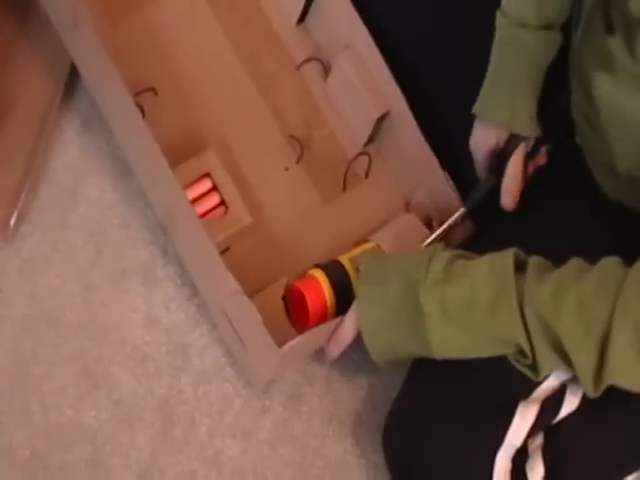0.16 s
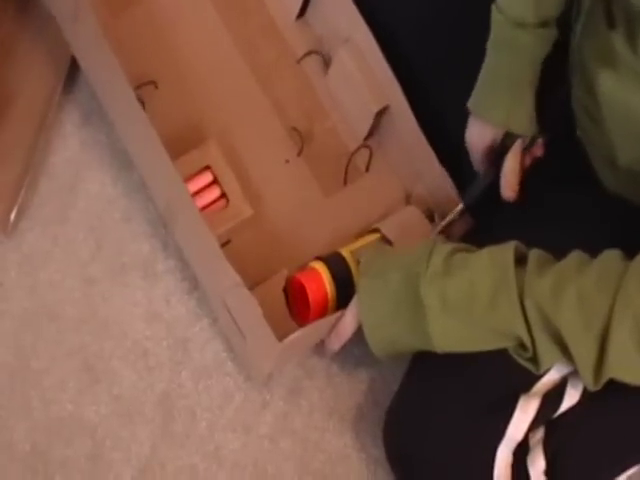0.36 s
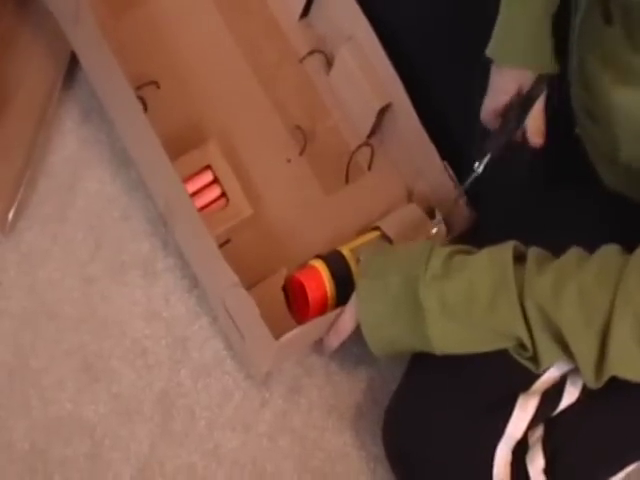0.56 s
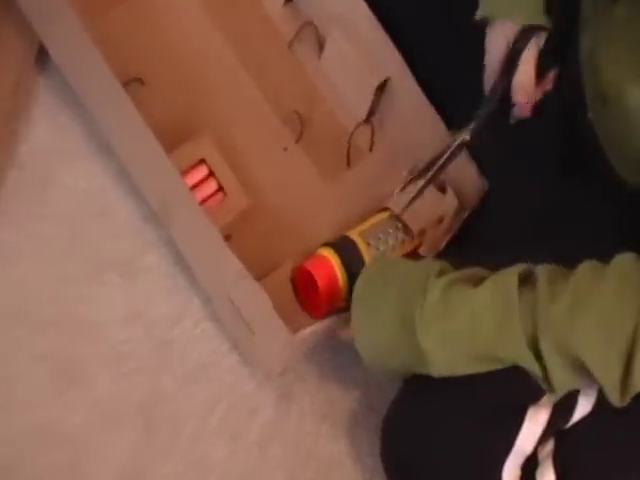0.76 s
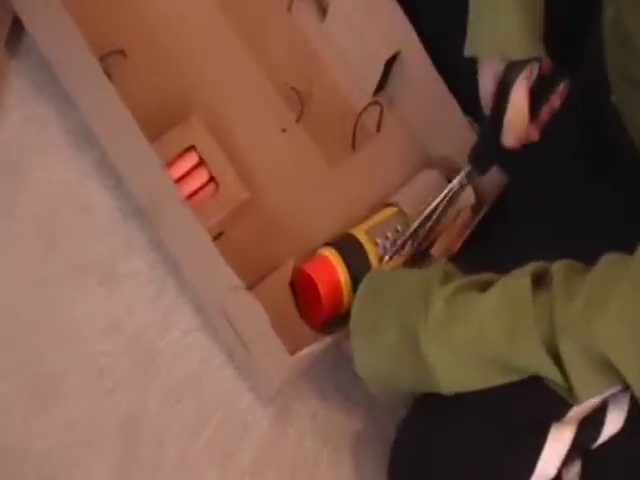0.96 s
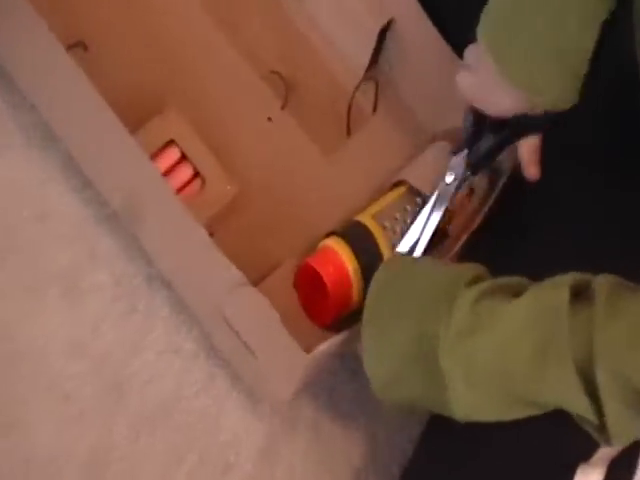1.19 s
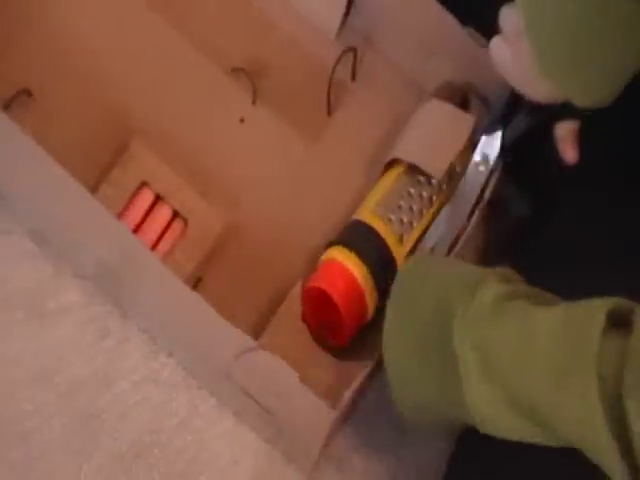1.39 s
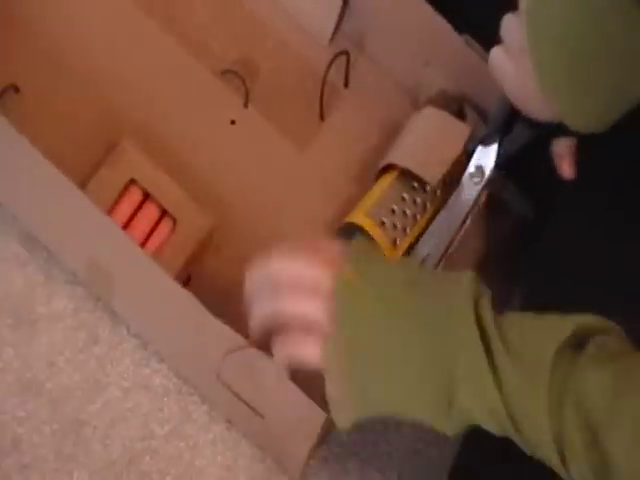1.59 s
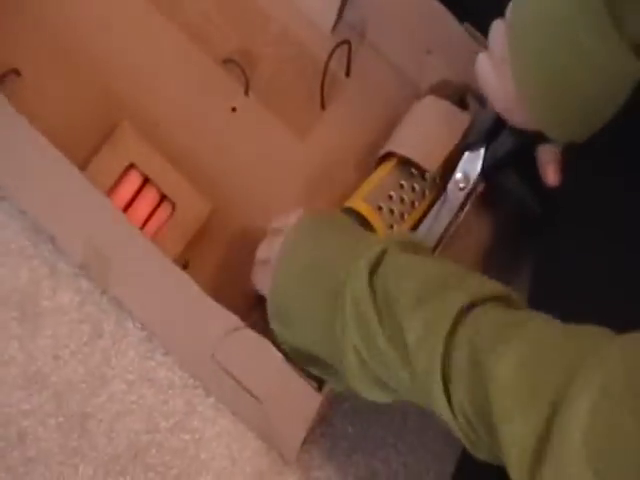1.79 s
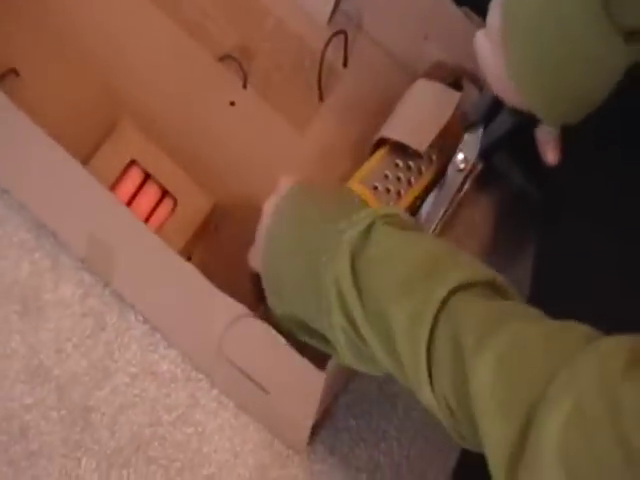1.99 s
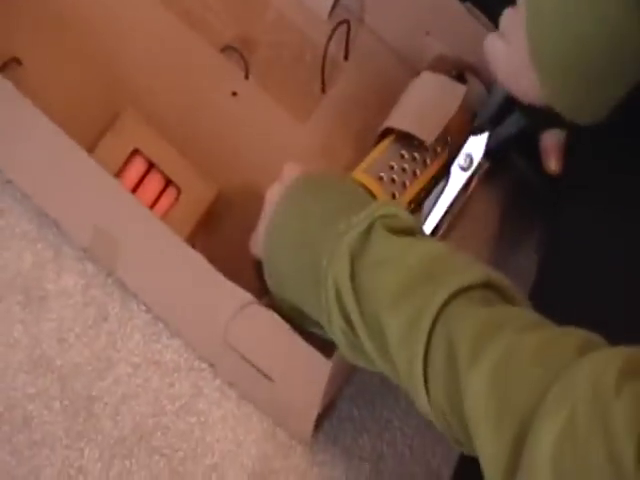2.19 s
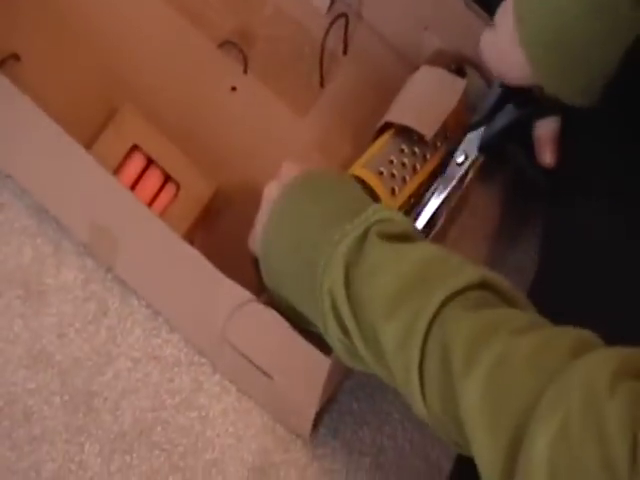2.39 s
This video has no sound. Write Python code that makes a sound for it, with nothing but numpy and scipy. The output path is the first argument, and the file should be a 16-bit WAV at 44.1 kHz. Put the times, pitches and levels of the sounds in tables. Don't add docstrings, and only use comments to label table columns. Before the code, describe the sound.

Scissors snip a wire tie: a faint knock fades, blades tick at 0.2 s, then one loud, bright metallic snap at 0.24 s with a short rattle. Light taps and rubs follow around 0.45 and 0.75 s. Hollow plastic knocks and steel clicks come at 0.95-1.2, 1.46 and 1.8-1.9 s, among cardboard thumps and scrapes, with a last small rustle near 2.15 s. Furnished room, faint hiss and hum.

```python
import sys
import numpy as np
from scipy import signal
from scipy.fft import rfft, irfft
from scipy.io import wavfile
from scipy.ndimage import uniform_filter1d

SR = 44100
rng = np.random.default_rng(int(sys.argv[2]) if len(sys.argv) > 2 else 0)


def generate_wav(sig):
    pcm = np.round(np.clip(np.atleast_2d(sig).T, -1, 1) * 32767).astype(np.int16)
    wavfile.write(sys.argv[1], SR, pcm)


def makeup_ratio(level_db):
    decades = np.asarray(level_db, float) / 20
    return 10 ** decades


N = 108045
T = np.arange(N) / SR
LEFT_RIGHT = np.array([[1], [-1]])


def unit(x):
    return x / np.sqrt(np.mean(x ** 2) + 1e-30)


def table(points, hz):
    p = np.array(points, float)
    return np.interp(np.log(hz + 1), np.log(p[:, 0]), p[:, 1])


def colour(x, points):
    gain = makeup_ratio(table(points, np.fft.rfftfreq(len(x), 1 / SR)))
    return irfft(rfft(x) * gain, len(x))


def band(x, hz, width):
    return signal.lfilter(*signal.iirpeak(min(hz, 18000), hz / width, fs=SR), x)


def body(x, modes, widen=1):
    return sum((-1) ** k * makeup_ratio(db) * band(x, f, w * widen) for k, (f, w, db) in enumerate(modes))


def high_pass(x, order, hz):
    return signal.sosfilt(signal.butter(order, hz, "high", fs=SR, output="sos"), x)


def walk(rate):
    k = int(SR / rate)
    steps = np.repeat(rng.standard_normal(N // k + 1), k)
    return unit(uniform_filter1d(steps, k)[:N])


def sparse_grains(per_s):
    return (rng.random(N) < per_s / SR) * rng.standard_normal(N)


def contacts(rows, voice):
    out, t = np.zeros(N), T[:4096]
    noise = rng.standard_normal((len(rows), 4096))
    for row, n in zip(rows, noise):
        tau = max(row[-1], .1) / 1000
        scrape = n * np.minimum(t / (0.22 * tau), 1) * np.exp(-t / (.5 * tau))
        hit = voice(scrape, row)
        start = int(row[0] * SR)
        hit = hit[:N - start] * makeup_ratio(row[1]) / np.abs(hit).max()
        out[start:start + len(hit)] += hit
    return out


# pitch_hz, level_db
HISS_SPECTRUM = [(15, -48), (25, -28), (405, -2.5), (641, -12), (936, -2), (1940, -8), (2840, -1),
                 (3340, -10.5), (16000, -21.5)]
HISS_DB, HISS_SIDE_DB = -65, -7.5
HUM_HZ, HUM_DB = 119.7, -88


def background():
    mid, side = (unit(colour(rng.standard_normal(N), HISS_SPECTRUM)) for _ in range(2))
    hum = np.sqrt(2) * makeup_ratio(HUM_DB) * np.sin(2 * np.pi * HUM_HZ * T)
    return makeup_ratio(HISS_DB) * (mid + makeup_ratio(HISS_SIDE_DB) * side * LEFT_RIGHT) + hum


# pitch_hz, t60_s
ROOM_T60 = [(300, 0.32), (3000, 0.54), (12000, 0.045)]
# pitch_hz, likeness_0_to_1
ROOM_LIKENESS = [(200, 0.95), (900, 1), (2200, 0.99), (5000, 0.56)]
# pitch_hz, level_db
ROOM_TONE = [(250, 6.5), (800, 5), (1700, 4), (2800, 1), (3400, 4), (5000, 1), (7000, -5), (14000, -5)]
ROOM_DB, ROOM_GAP_S = -9, 0.00035


def room(x):
    t = T[:SR * 3 // 4]
    mid, side = rng.standard_normal((2, len(t)))
    tail = 0
    for hz in 125 * 2. ** np.arange(8):
        like = np.clip(table(ROOM_LIKENESS, hz), 0, 1)
        ears = np.sqrt(1 + like) * mid + np.sqrt(1 - like) * side * LEFT_RIGHT
        tail = tail + band(ears, hz, hz * 0.54) * makeup_ratio(-60 * t / table(ROOM_T60, hz))
    power = np.sum(np.abs(rfft(tail)) ** 2, axis=0)
    tone = makeup_ratio(table(ROOM_TONE, np.fft.rfftfreq(len(t), 1 / SR)))
    tail = irfft(rfft(tail) * tone / np.sqrt(uniform_filter1d(power, size=40)), len(t))
    fade_in = np.clip(t / ROOM_GAP_S, 0, 1) ** 2
    fade_out = np.clip(2 - 2 * t / t[-1], 0, 1) ** 2
    tail = tail * fade_in * fade_out
    tail = tail / np.sqrt(np.sum(tail ** 2) / 2)
    return makeup_ratio(ROOM_DB) * signal.fftconvolve(x, tail, axes=1)[:, :N]


# pitch_hz, left_minus_right_db
PORT_LEVEL = [(200, 3), (700, 0.4), (2400, 0.5), (4400, 4), (8100, 2), (13000, 3)]
# pitch_hz, left_leads_rad
PORT_PHASE = [(200, -0.48), (1500, 0.0041), (4500, 0.15), (7700, -1.04), (8500, 1), (12000, -0.55)]


def ports(x):
    hz = np.fft.rfftfreq(N, 1 / SR)
    half = makeup_ratio(table(PORT_LEVEL, hz) / 2) * np.exp(.5j * table(PORT_PHASE, hz))
    return np.array([irfft(rfft(x) * half, N), irfft(rfft(x) / half, N)])


FLOOR_DIP, FLOOR_DIP_HZ, FLOOR_DIP_WIDTH_HZ = 0.31, 3114, 670
LOW_CUT_HZ = 270


def path(x):
    x = x - FLOOR_DIP * band(x, FLOOR_DIP_HZ, FLOOR_DIP_WIDTH_HZ)
    return ports(high_pass(x, 4, LOW_CUT_HZ))


# pitch_hz, width_hz, level_db
EARLIER_MODES = [(1556, 330, -0.5), (2760, 190, -3), (4530, 1340, -10.5)]
# pitch_hz, level_db, t60_s
EARLIER_TONES = [(453.6, -58, 0.36), (914, -45, 0.22), (980, -50, 0.25)]
EARLIER_DB, EARLIER_T60_S = -47.5, 0.26


def earlier():
    tones = sum(makeup_ratio(db - 60 * T / t60) * np.sin(2 * np.pi * hz * T) for hz, db, t60 in EARLIER_TONES)
    wash = unit(body(rng.standard_normal(N), EARLIER_MODES, 0.92))
    return tones + makeup_ratio(EARLIER_DB - 60 * T / EARLIER_T60_S) * wash


# start_s, level_db, contact_ms, pitch_hz of the wall
THUMPS = [(.195, -34.5, 7.5, 583), (.212, -38, 34, 510), (.242, -25.5, 15.8, 780), (.246, -37, 40, 413),
          (.722, -41, 18, 660), (.767, -42, 5.1, 754), (1.061, -42.5, 11.5, 412), (1.186, -44, 32, 426),
          (1.324, -35, 17, 343), (1.356, -79, 33, 370), (1.457, -37, 10.6, 438), (1.766, -36.5, 8.3, 430),
          (1.778, -38, 7.2, 427), (1.788, -36.5, 22, 395), (1.809, -39, 8.7, 404)]
THUMP_DB = 2


def tray():
    def thump(x, row):
        return band(band(x, row[2], row[2] * 0.38), row[2], row[2] * 13.0)
    rows = [(s, db, hz, ms) for s, db, ms, hz in THUMPS]
    return makeup_ratio(THUMP_DB) * contacts(rows, thump)


# start_s, level_db, pitch_hz, contact_ms
TAPS = [(.1984, -24.5, 1650, 7.3), (.199, -31.5, 3900, 16), (.206, -33, 1770, 12), (.2245, -43, 1730, 27),
        (.4589, -28.5, 2400, 7.4), (.4958, -25.5, 1605, 2.6), (.7322, -35.5, 1006, 18),
        (.7664, -33.5, 990, 2.4), (.789, -39.5, 950, 1.9), (1.0625, -28.5, 2420, 4.4),
        (1.184, -30, 3700, 7.7), (1.2632, -32, 1940, 8.2), (1.3245, -26.5, 1470, 4),
        (1.331, -31.5, 860, 13), (1.357, -31.5, 1120, 1.9), (1.365, -35, 1400, 2.9),
        (1.413, -36, 2200, 6.5), (1.424, -35, 2070, 8), (1.449, -31.5, 2320, 4.5),
        (1.766, -38.5, 1480, 4.6), (1.778, -39, 1480, 4.7), (1.7905, -48, 2640, 1.3),
        (1.794, -39, 1430, 12), (1.801, -43, 1390, 7.2), (1.812, -56, 1600, 3), (1.8225, -28, 1300, 7.9),
        (1.828, -28, 1600, 4.3), (1.8335, -28, 1380, 11), (1.84, -33, 1030, 2.8), (1.847, -34, 980, 7.1),
        (1.866, -41, 2210, 5), (1.8916, -25.5, 2270, 6.2), (2.149, -34, 1170, 24.3), (2.156, -32, 2240, 13),
        (2.1625, -35, 1340, 7.3), (2.17, -35.5, 1420, 10)]
TAP_DB, TAP_Q = -0.5, 2.2


def card_taps():
    def tap(x, row):
        return band(band(x, row[2], row[2] / TAP_Q), row[2], 2 * row[2])
    return makeup_ratio(TAP_DB) * contacts(TAPS, tap)


# peak_s, rise_ms, fall_ms, level_db, brightness_db
STROKES = [(0.174, 3.4, 61, -53, 7), (0.434, 39, 14, -49, 4), (0.481, 32, 37, -42, 8),
           (0.691, 23, 21, -55, 9.5), (0.726, 25, 23, -43.5, 4), (.762, 22, 73, -54, 13.5),
           (0.865, 37, 120, -50, 7), (1.049, 18.5, 34, -50.5, 10.5), (1.092, 20, 9.2, -41, -2),
           (1.136, 20.5, 22, -55.5, 21.5), (1.167, 17, 39, -44.5, 17.5), (1.238, 37, 35, -48, -22),
           (1.289, 26, 46, -41.5, 6), (1.346, 31, 35, -45, 10), (1.43, 5.8, 69, -45, 12.5),
           (1.501, 65, 71, -56, 8), (1.624, 35, 185, -51, 6), (1.73, 9.7, 26, -52, 12.5),
           (1.798, 34, 15, -41, -4), (1.831, 26.6, 33, -38.5, 7.5), (1.908, 14.4, 51, -39.5, 12),
           (2.025, 12, 26, -50, -16), (2.101, 10, 93, -58.5, 13.5), (2.149, 9.8, 38.6, -47.5, 14),
           (2.413, 4.5, 17, -50, -11), ]
# pitch_hz, level_db
CARD_SPECTRUM = [(150, -38), (398, -5), (566, -11.5), (1190, -9), (1310, -14), (1530, -6), (3400, -17),
                 (12900, -31), (16000, -40)]
# pitch_hz, width_hz, level_db
WALLS = [(907, 75, 3.5), (1190, 65, 5), (1538, 82, 0), (2194, 60, -3.5), (2805, 173, -5.5),
         (4030, 310, -17), (5240, 167, -22.5)]
RUB_DB, RUB_BODY_DB, FIDGET_DB = -6, -3.5, -64.5
GRAINS_PER_S, GRAIN_SPREAD_DB, FLICKER_DB, EVEN_S = 3000, 3.5, 1.5, .03
WALL_WANDER_DB = 5


def rubbing():
    grains = sparse_grains(GRAINS_PER_S) * makeup_ratio(GRAIN_SPREAD_DB * rng.standard_normal(N))
    grains = grains + 0.32 * rng.standard_normal(N)
    grains = grains / np.sqrt(uniform_filter1d(grains ** 2, size=int(EVEN_S * SR)))
    grains = grains * makeup_ratio(FLICKER_DB * walk(90))
    ring = unit(sum(makeup_ratio(db + WALL_WANDER_DB * walk(25.035)) * band(grains, f, w) for f, w, db in WALLS))
    card = unit(unit(colour(grains, CARD_SPECTRUM)) + makeup_ratio(RUB_BODY_DB) * ring)
    high = high_pass(card, 1, 3000)
    out = makeup_ratio(FIDGET_DB) * card
    for s, rise, fall, db, bright_db in STROKES:
        stroke = np.exp(-np.where(T < s, ((s - T) * 1000 / rise) ** 2, (T - s) * 1000 / fall))
        out = out + makeup_ratio(db + RUB_DB) * stroke * (card + (makeup_ratio(bright_db) - 1) * high)
    return out


# start_s, level_db, contact_ms
KNOCKS = [(.9438, -32, 3.6), (.9526, -25, 15), (1.0628, -29, 18), (1.1805, -23, 8), (1.185, -24.5, 20),
          (1.4570, -24, 3), (1.4595, -28, 5.1), (1.4645, -37, 3), (1.7905, -27.5, 8.3), (1.8925, -29, 4.5),
          (2.1464, -42, 3.2)]
# pitch_hz, width_hz, level_db
TUBE_MODES = [(865, 90, -15), (1207, 44, 0), (1560, 110, -10), (2120, 70, -10), (2780, 120, -14),
              (4300, 400, -28)]
KNOCK_DB, KNOCK_SCRAPE = -0.5, .12


def tube():
    def knock(x, row):
        blow = np.arange(len(x)) == 2
        return body(KNOCK_SCRAPE * x / np.abs(x).max() + blow, TUBE_MODES)
    return makeup_ratio(KNOCK_DB) * contacts(KNOCKS, knock)


# pitch_hz, width_hz, level_db
SHIVER_MODES = [(815, 210, -3), (1500, 60, -1), (1714, 120, 1), (2370, 78, -7), (2815, 140, 0),
                (4600, 340, -7), (5200, 540, -3.5), (5860, 420, -9), (7300, 2100, -19)]
SHIVER_S, SHIVER_DB, SHIVER_T60_S, SHIVER_PER_S = .245, -34.5, 0.48, 900


def shiver():
    rattle = unit(body(sparse_grains(SHIVER_PER_S), SHIVER_MODES, 0.74))
    fade = makeup_ratio(SHIVER_DB - 60 * np.abs(T - SHIVER_S) / SHIVER_T60_S)
    return (T > SHIVER_S) * fade * rattle


# start_s, level_db, pitch_hz, scrape_ms
TICKS = [(.1945, -28.5, 4100, 7.2), (.199, -30.5, 11100, 12), (.2235, -35, 5450, 15.6),
         (.4559, -34.5, 4700, 7.7), (.4748, -35, 8500, 3.5), (.4804, -39, 8070, 2.2),
         (.5124, -47, 9000, 3.2), (.7292, -36.5, 6800, 3.6), (.8664, -45.5, 4050, 6.5),
         (.9432, -39.5, 6470, 3.2), (.9524, -35.5, 7400, 4.3), (1.0665, -36.5, 7800, 4.5),
         (1.0904, -45, 9000, 1.4), (1.1234, -60, 9000, 1.8), (1.1528, -34.5, 4970, 1.8),
         (1.1702, -26.5, 5800, 5.4), (1.4124, -58, 4430, 2.3), (1.6084, -42, 5000, 6.9),
         (1.822, -38.5, 7840, 18), (1.8906, -26.5, 7300, 2.7), (2.0014, -51, 5000, 1.4),
         (2.0158, -38.5, 4830, 1.6), (2.1445, -31.5, 5200, 11), (2.153, -36, 4630, 18),
         (2.163, -41, 5400, 9.1), (1.834, -45, 4200, 7), (1.899, -33.5, 4570, 7.8)]
# start_s, level_db, pitch_hz, width_hz, rattle_ms
SNAP = [
    (.2409, -4.5, 4540, 3700, 1.9),
    (.2411, -14, 1560, 1260, 1.6),
    (.2432, -5.5, 12400, 5300, 2.4),
    (.2433, -12, 8760, 3070, 0.35),
    (.2442, -16, 2560, 1860, 2.3),
    (.2434, -16, 6900, 2500, 2.4),
    (.9434, -28, 4800, 1310, 7.8),
    (.9436, -36, 8900, 1500, 2.4),
    (.9527, -33.5, 4100, 700, 6.6),
    (1.8912, -27, 5200, 2000, 5),
]
TICK_DB, TICK_Q, TICK_AIR_DB, SNAP_RATTLE_DB = 2, 1.6, -30, -14


def blades():
    def tick(x, row):
        steel = unit(band(x, row[2], row[2] / TICK_Q))
        return steel + makeup_ratio(TICK_AIR_DB) * unit(band(x, 16000, 6000))

    def blow(x, row):
        x = makeup_ratio(SNAP_RATTLE_DB) * x / np.abs(x).max() + (np.arange(len(x)) == 4)
        return band(band(x, row[2], row[3]), row[2], row[3])
    return makeup_ratio(TICK_DB) * contacts(TICKS, tick) + contacts(SNAP, blow)


TUBE_ROOM_DB = -9


def scene():
    knocks = tube()
    rest = earlier() + tray() + card_taps() + rubbing() + shiver() + blades()
    direct = path(rest + knocks)
    reverb = room(path(rest + makeup_ratio(TUBE_ROOM_DB) * knocks))
    return direct + reverb + background()


def top_cut(x):
    return signal.sosfilt(signal.butter(12, 16250, fs=SR, output="sos"), x)


TOP_HZ = 15950


def record(dry):
    mix = signal.sosfilt(signal.ellip(8, .2, 60, TOP_HZ, fs=SR, output="sos"), dry)
    return top_cut(mix)


dry = scene()
out = record(dry)
generate_wav(out)
```